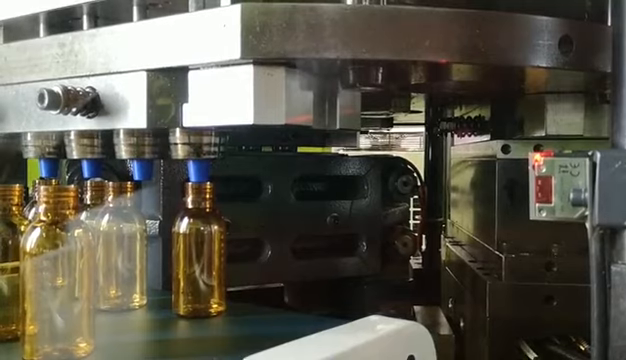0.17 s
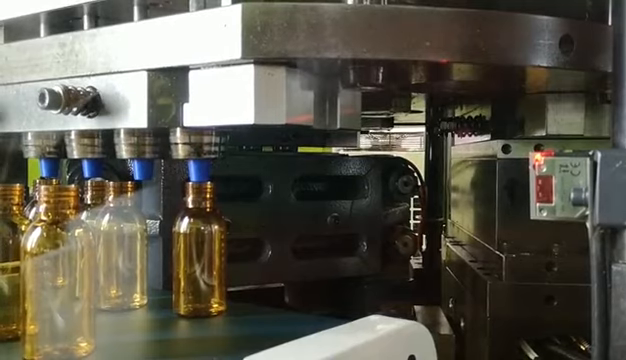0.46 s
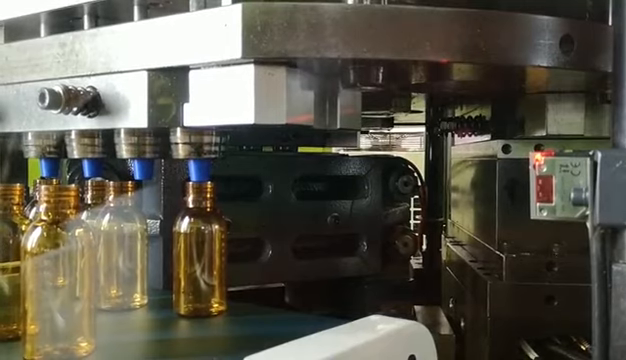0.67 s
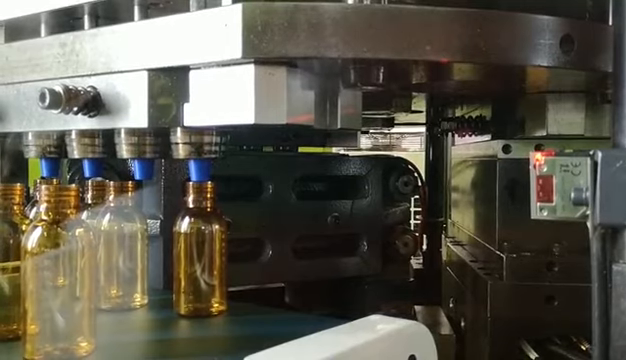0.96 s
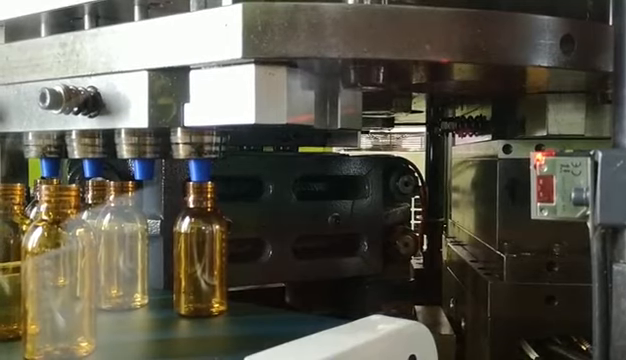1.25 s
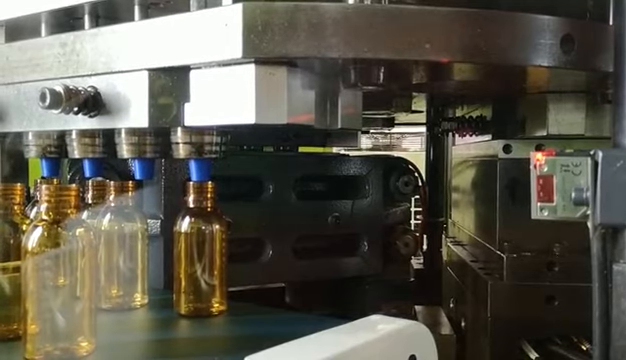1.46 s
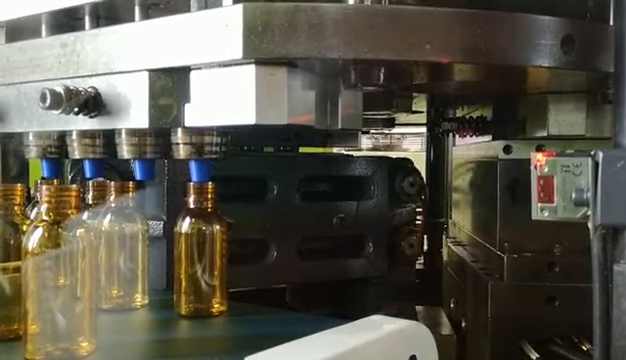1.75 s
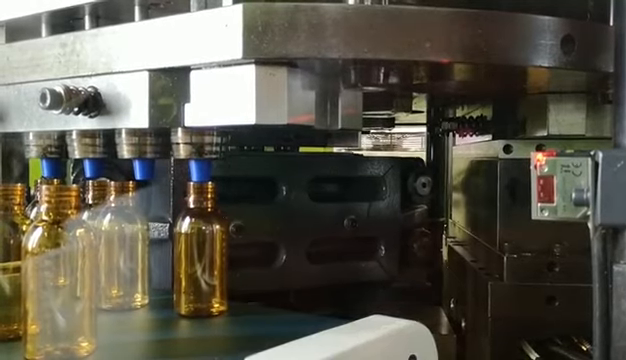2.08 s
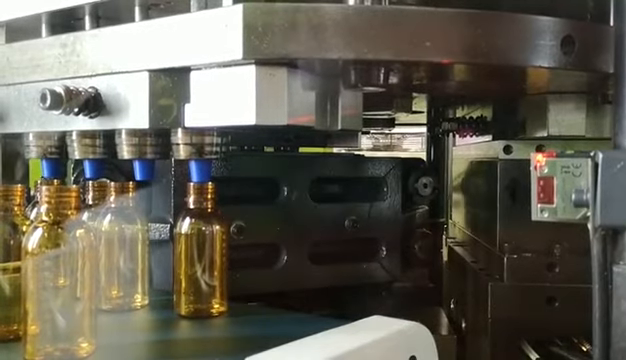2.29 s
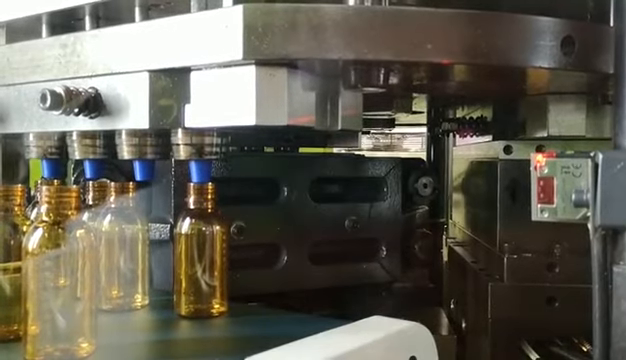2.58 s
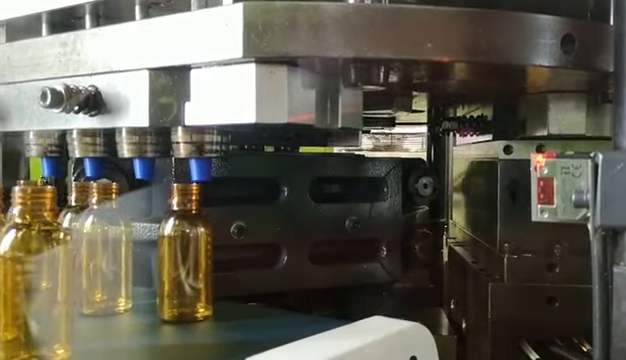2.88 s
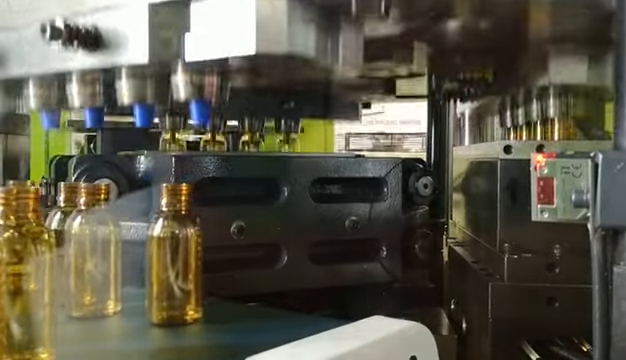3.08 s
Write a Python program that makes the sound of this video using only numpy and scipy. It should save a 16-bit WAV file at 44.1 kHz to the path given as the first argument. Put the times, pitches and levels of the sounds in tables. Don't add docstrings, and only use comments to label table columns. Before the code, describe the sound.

Close stereo pickup of a bottle moulding machine: compressed air sighs off, the hall hums softly, then slides thud and clank on steel with sharp air snaps, and a pump tone rises near the end.

```python
import sys
import numpy as np
from scipy import signal
from scipy.fft import rfft, irfft, next_fast_len
from scipy.io import wavfile
from scipy.ndimage import uniform_filter1d

SR = 44100
rng = np.random.default_rng(int(sys.argv[2]) if len(sys.argv) > 2 else 0)


def wav_out(sig):
    wavfile.write(sys.argv[1], SR, np.round(np.clip(np.atleast_2d(sig).T, -1, 1) * 32767).astype(np.int16))


def amplitude_ratio(level_db):
    exponent = np.asarray(level_db, float) / 20
    return 10 ** exponent


N = 142443
T = np.arange(N) / SR


def evened(x):
    return x / np.sqrt(np.mean(x ** 2) + 1e-20)


def read(points, hz):
    f, value = np.transpose(points)
    return np.interp(np.log(hz + 1), np.log(f + 1), value)


def curve(points):
    return np.interp(T, *np.transpose(points))


def slow(rate_hz):
    drift = 0
    for f in np.geomspace(rate_hz / 20, rate_hz, 20):
        drift = drift + np.sin(2 * np.pi * (f * T + rng.random())) / np.sqrt(f)
    return evened(drift)


def noise(shape, patchy_db=0):
    frames, hz = N // 256 + 5, np.fft.rfftfreq(1024, 1 / SR)
    a, b, c, d, patches = rng.standard_normal((frames, 513, 5)).T
    patches = uniform_filter1d(patches, size=5, axis=0)
    patches = evened(uniform_filter1d(patches, size=8, axis=1))
    level_db = read(shape, np.clip(hz, shape[0][0], None))
    level_db = level_db - 40 * np.log2(np.maximum(hz / shape[-1][0], 1))
    z = np.array([a + 1j * b, c + 1j * d]) * amplitude_ratio(level_db[:, None] + patchy_db * patches)
    return evened(signal.istft(z, nperseg=1024, noverlap=768)[1][:, :N])


def resonances(x, peaks):
    out = 0
    for hz, width, db in peaks:
        b, a = signal.iirpeak(hz, hz / max(1.5 * width, 5), SR)
        ring = signal.lfilter(np.convolve(b, b), np.convolve(a, a), x)
        out = out + amplitude_ratio(db) * evened(ring)
    return evened(out)


def rings(rows, rise, fall):
    sag_db = -3
    out = np.zeros((2, N + SR))
    turns = rng.random((len(rows), 1)) + [0, -1 / 4]
    for (s, length, hz, db), turn in zip(rows, turns):
        t = np.arange(round((length + 8 * fall) * SR)) / SR
        shape = np.clip(t / rise, 0, 1) * np.exp(-np.maximum(t - length, 0) / fall)
        level = np.sqrt(2) * amplitude_ratio(db + sag_db * np.clip(t / length, 0, 1))
        at = max(round(s * SR), 0)
        out[:, at:at + len(t)] += level * shape * np.sin(2 * np.pi * (hz * t + turn[:, None]))
    return out[:, :N]


def frame():
    # (start [s], length [s], frequency [Hz], level [dB])
    shakes = [(.015, .03, 91.5, -12.5), (0, 0.033, 194.6, -21.5), (.14, .05, 80, -21),
              (.205, 0.043, 84.6, -21.5), (.25, 0.035, 72, -24.5), (.295, 0.047, 170.6, -23.5),
              (.14, 0.033, 188, -22.5), (1.44, 0.039, 153, -22), (1.5, 0.026, 93, -15),
              (1.55, 0.038, 98, -14.5), (1.6, 0.05, 156.4, -16.5), (1.733, 0.033, 160.3, -7),
              (1.61, .035, 99.6, -12), (1.735, 0.029, 266, -15.5), (1.75, 0.023, 79.8, -12.5),
              (1.775, 0.027, 93, -7.5), (1.785, 0.039, 202.3, -12.5), (1.79, 0.028, 293, -23),
              (1.808, 0.019, 126.6, -8.5), (1.825, 0.017, 144.5, -9), (1.858, 0.019, 143.5, -7),
              (1.862, 0.029, 70.4, -14.5), (1.895, .03, 175, -16.5), (1.895, 0.017, 92.7, -22),
              (1.922, .026, 94.8, -14), (1.962, 0.027, 170, -18), (1.977, .025, 115, -14),
              (2.005, .03, 128.6, -17), (2.055, 0.019, 118.4, -13.5), (2.075, .09, 61.8, -21.5),
              (2.1, .03, 96.5, -21.5), (2.283, 0.026, 275, -13.5), (2.316, 0.022, 178.7, -9.5),
              (2.32, 0.028, 81.4, -12), (2.32, 0.027, 309, -19.5), (2.344, 0.018, 176, -11.5),
              (2.371, .036, 161.5, -11.5), (2.395, 0.021, 62, -22), (2.425, .025, 145.5, -21.5),
              (2.496, 0.015, 92, -14), (1.67, 0.033, 149.6, -18.5), (2.519, .05, 76.3, -9),
              (2.505, 0.013, 254, -16.5), (2.533, .02, 223, -10), (2.598, 0.035, 86.4, -10.5),
              (2.628, 0.03, 70, -16.5), (2.59, 0.043, 162, -12.5), (2.652, .022, 142.5, -16.5),
              (2.67, .035, 273.6, -21.5), (2.802, 0.12, 74.5, -26)]
    # (start [s], length [s], frequency [Hz], level [dB])
    knocks = [(2.496, .004, 950, -13), (2.501, .003, 1800, -15), (2.502, .003, 2650, -18),
              (2.503, .005, 900, -16), (2.511, .003, 2100, -12), (2.514, .004, 1700, -17),
              (2.516, .008, 1100, -18), (2.518, .004, 2500, -19), (2.531, .003, 1800, -18),
              (2.494, .02, 415, -20), (2.007, .01, 800, -24), (2.015, .012, 1020, -25),
              (2.02, .025, 370, -19), (2.035, .01, 1250, -25), (2.05, .015, 900, -24),
              (2.008, .03, 490, -21), (2.29, .012, 960, -24), (2.292, .008, 1400, -26),
              (2.305, .015, 900, -23), (2.322, .012, 880, -25), (2.29, .02, 450, -22),
              (2.325, .025, 430, -23), (2.475, .015, 1000, -25), (.148, .018, 1870, -17),
              (.176, .008, 1900, -18), (.15, .015, 3280, -24), (.002, .025, 2305, -20),
              (.045, .02, 2300, -24), (.03, .03, 2780, -26), (.11, .025, 2190, -25),
              (1.745, .015, 2020, -27)]
    # (time [s], level [dB])
    effort = [(0, -23), (.3, -27), (.4, -45), (1.4, -45), (1.55, -23), (1.72, -26), (1.74, -17),
              (1.95, -22), (2.27, -31), (2.29, -22), (2.48, -35), (2.505, -21), (2.72, -33), (3.23, -36)]
    # (frequency [Hz], level [dB])
    rumble = [(15, -17.5), (28, -5), (45, 0), (80, -4.5), (160, 4), (260, -3), (380, -16.5), (600, -31)]
    jolts = rings(shakes, rise=.007, fall=.0052)
    contacts = rings(knocks, rise=.0022, fall=.0022)
    return jolts + contacts + amplitude_ratio(curve(effort)) * noise(rumble, patchy_db=-4.5)


def clank(s, hold, db, t60, body):
    t = np.arange(SR // 2) / SR
    blow = np.minimum(t / .009, 1) * (1 + .5 * np.exp(-t / .015))
    decay = amplitude_ratio(-60 * np.maximum(t - hold, 0) / max(t60, .02))
    chatter = rng.standard_normal((2, len(t))) * blow * decay
    sounding = np.sqrt((hold + t60 / 14) / .5)
    out, at = np.zeros((2, N + SR)), round(s * SR)
    out[:, at:at + len(t)] = amplitude_ratio(db) * resonances(chatter, body) * sounding
    return out[:, :N]


def clanks():
    # (start [s], chatter [s], level [dB], t60 [s])
    slides = [
        (2.0, 0.049, -21.5, 0.4),
        (2.736, 0.04, -26.5, 0.53),
        (2.8, 0.22, -34.5, 0.31),
        (2.97, 0.17, -32, 0.71),
        (3.182, 0.096, -23.5, 1),
    ]
    # (frequency [Hz], width [Hz], level [dB])
    plate = [(374, 110, 0.5), (570, 15, -0.5), (818, 110, -2), (1081, 36, -4), (1350, 520, -5),
             (2210, 1100, -5)]
    # (start [s], chatter [s], level [dB], t60 [s])
    stops = [
        (2.283, 0.037, -18, 0.75),
        (2.493, 0.03, -19.5, 0.55),
    ]
    # (frequency [Hz], width [Hz], level [dB])
    block = [(294, 110, 5), (420, 87, -7.5), (535, 38, -9.5), (971, 71, -6), (1156, 170, -7),
             (2000, 920, -5.5)]
    return sum(clank(*row, plate) for row in slides) + sum(clank(*row, block) for row in stops)


def bursts(rows):
    power = 0
    for s, hold, db, t60, rise in rows:
        attack = np.clip((T - s) / max(rise, 1e-3), 0, 1)
        level = amplitude_ratio(db - 60 * np.maximum(T - s - hold, 0) / max(t60, .02))
        power = power + (attack * level) ** 2
    return np.sqrt(power)


def vent(envelope, pipe, jet):
    return envelope * evened(resonances(rng.standard_normal((2, N)), pipe) + jet)


def vents():
    # (frequency [Hz], level [dB])
    jet_shape = [(700, -30.5), (1500, 1), (2500, 7.5), (4000, 2.5), (6000, -0.5), (7500, -3)]
    # (time [s], level [dB])
    flow = [(0, -16), (.04, -19.5), (.13, -20), (.16, -18), (.24, -27.5), (.27, -30), (.33, -76)]
    # (start [s], hold [s], level [dB], t60 [s], rise [s])
    sigh = [
        (.17, 0.06, -28.5, 0.21, 0.018),
    ]
    snap = [
        (.146, 0.019, -16, .5, 0.01),
        (2.499, 0.018, -19.5, .22, 0.0048),
        (3.205, .04, -19, .3, 0.017),
    ]
    puffs = [
        (1.463, 0.045, -23.5, 0.42, 0.0058),
        (1.728, 0.022, -27.5, 0.65, 0.014),
        (1.92, 0.013, -34, 0.23, 0.0057),
        (2.468, 0.088, -25, 0.46, 0.013),
        (2.73, 0.02, -30, 0.29, 0.025),
        (3.165, .07, -33.5, .3, 0.011),
        (2.02, 0.02, -40.5, 0.11, 0.0093),
    ]
    squeaks = [
        (1.785, 0.02, -35, 0.2, 0.0081),
        (2.76, 0.072, -36, 0.25, 0.007),
    ]
    # (frequency [Hz], width [Hz], level [dB])
    long_pipe = [(2010, 140, -11), (2315, 130, 11), (3000, 110, -11), (3270, 130, -7.5), (3870, 200, -0.5),
                 (4900, 250, -18), (5610, 210, 2.5)]
    sigh_pipe = [(1225, 460, 0)]
    snap_pipe = [(1530, 160, -9.5), (1910, 440, 4), (2173, 190, -6.5), (2476, 60, -4.5), (3430, 210, -26.5),
                 (3760, 83, -9)]
    puff_pipe = [(2020, 340, 0.5), (2654, 97, 3.5), (3620, 580, -9), (5050, 720, 0.5), (5480, 490, -1.5),
                 (6860, 980, -17)]
    squeak_pipe = [(3730, 210, 0)]
    jet = noise(jet_shape, patchy_db=4.0)
    long_vent = vent(amplitude_ratio(curve(flow)), long_pipe, amplitude_ratio(3.0) * jet) + vent(bursts(sigh), sigh_pipe, 0)
    snapping = vent(bursts(snap), snap_pipe, amplitude_ratio(-25.0) * jet)
    puffing = vent(bursts(puffs), puff_pipe, amplitude_ratio(-1.0) * jet)
    return long_vent + snapping + puffing + vent(bursts(squeaks), squeak_pipe, 0)


def pump():
    # (time [s], level [dB])
    load = [(0, -54), (.9, -41.5), (1.05, -35), (1.45, -38.5), (2.1, -41.5), (2.6, -40), (2.72, -26),
            (2.82, -24.5), (2.85, -34.5), (2.93, -24), (3.23, -28.5)]
    pump_hz, wander_hz, third_hz, whine_hz, whine_stop_s = 299, 3.5, 883, 5168, 2.5
    turns = 2 * np.pi * np.cumsum(pump_hz + wander_hz * slow(12)) / SR
    level = np.sqrt(2) * amplitude_ratio(curve(load) + 2 * slow(40))
    first = level * np.array([np.sin(turns), np.sin(turns - .5)])
    second_level = level * amplitude_ratio(-13 + 3 * slow(30))
    second = second_level * np.sin(2 * turns) * np.array([[1], [-.8]])
    third_level = np.sqrt(2) * amplitude_ratio(-47 + 2.5 * slow(30) - 8 * np.clip(T - 1.4, 0, 1))
    wander = turns - 2 * np.pi * pump_hz * T
    third = third_level * np.sin(2 * np.pi * third_hz * T + .2 * wander)
    whine_level = np.sqrt(2) * amplitude_ratio(-59 + 3.2 * slow(27)) * (T < whine_stop_s)
    whine = whine_level * np.sin(2 * np.pi * whine_hz * T + slow(20))
    return first + second + third + whine


def hall():
    # (frequency [Hz], level per Hz [dB])
    wash = [(15, -54.5), (25, -7.5), (96, 0), (119, -3.5), (210, -4.5), (269, -3), (300, -9), (324, -9.5),
            (1000, -18.5), (1300, -52), (2200, -120)]
    fizz = [(350, -31), (600, -7.5), (688, -16), (857, -11), (932, -7), (2180, -7), (4360, -22.5),
            (5320, -24.5), (7370, -31.5), (9580, -70.5), (16200, -120)]
    low = amplitude_ratio(-24) * noise(wash, patchy_db=1.47)
    upper = amplitude_ratio(-30.5) * noise([(350, -40)] + fizz, patchy_db=2.0)
    return amplitude_ratio(.7 * slow(4)) * (low + upper)


def ports(x, lean):
    # (frequency [Hz], correlation [0-1])
    likeness = [(60, .985), (140, .94), (220, .89), (340, .78), (600, .72), (860, .35), (1380, .45),
                (2500, .38), (4500, .25)]
    # (frequency [Hz], phase [rad])
    ahead = [(60, -.02), (340, -.5), (600, -3.0), (860, -.8), (1380, -.2), (1810, -1.6)]
    size = next_fast_len(N + 4096)
    hz, (a, b) = np.fft.rfftfreq(size, 1 / SR), rfft(x, size)
    same, tilt = np.clip(read(likeness, hz), 0, 1), amplitude_ratio(read(lean, hz) / 2)
    lead = np.exp(.5j * read(ahead, hz))
    left = a * tilt * lead
    right = (same * a + np.sqrt(1 - same ** 2) * b) / tilt / lead
    return irfft(np.array([left, right]), size)[:, :N]


def scene():
    # (frequency [Hz], left over right [dB])
    near_lean = [(800, -0.5), (1900, -1.5), (2900, -5), (4500, -11), (5800, -5.5), (7000, -3.5)]
    hall_lean = [(900, -0.2), (1900, -1.5), (2900, -7), (3500, -12), (4300, -9.5), (5200, -13),
                 (6300, -5.5), (7400, -2)]
    near = frame() + clanks() + vents()
    return ports(near, near_lean) + pump() + ports(hall(), hall_lean)


def top_cut(x):
    return signal.sosfilt(signal.butter(12, 7520, fs=SR, output="sos"), x)


def record(dry):
    power_db = 10 * np.log10(abs(uniform_filter1d((dry ** 2).mean(0), size=2000)) + 1e-12)
    fall = T * 22.
    held_db = np.maximum.accumulate(power_db + fall) - fall
    over_db = np.maximum(held_db + 18, 0)
    ducked = dry / amplitude_ratio(.27 * uniform_filter1d(over_db, size=400))
    ducked = np.tanh(ducked / 1.1) * 1.1
    low_pass = signal.firwin(1023, 7560, window=("kaiser", 10), fs=SR)
    mix = signal.oaconvolve(ducked, low_pass[None], "same")
    return top_cut(mix)


dry = scene()
out = record(dry)
wav_out(out)
```